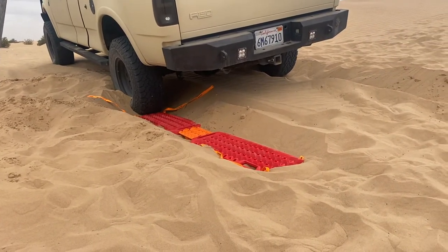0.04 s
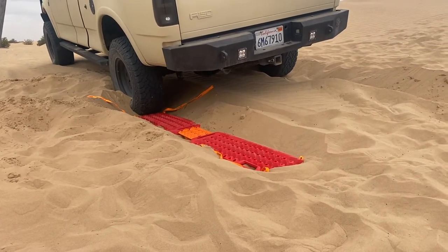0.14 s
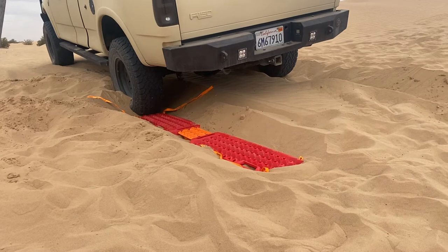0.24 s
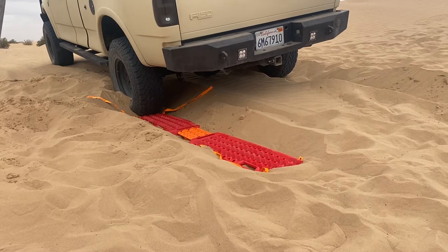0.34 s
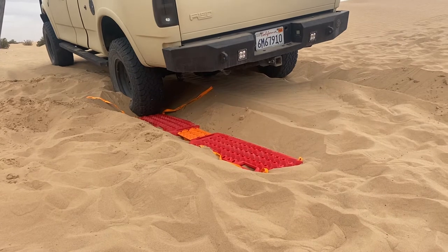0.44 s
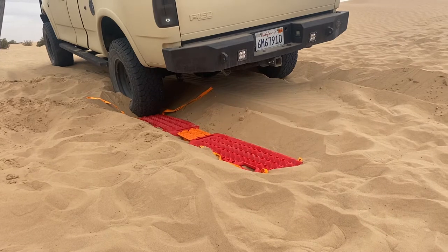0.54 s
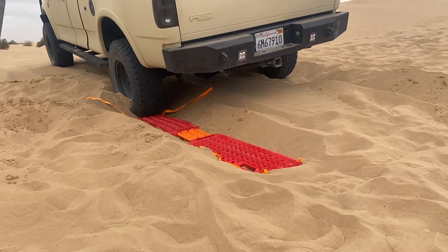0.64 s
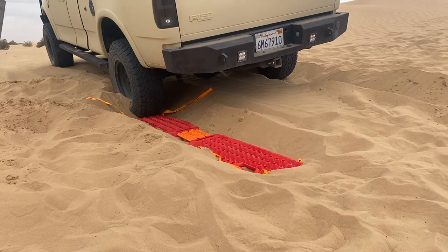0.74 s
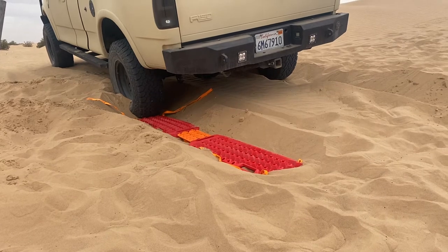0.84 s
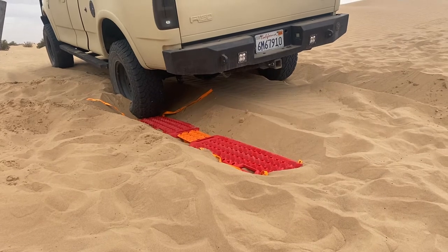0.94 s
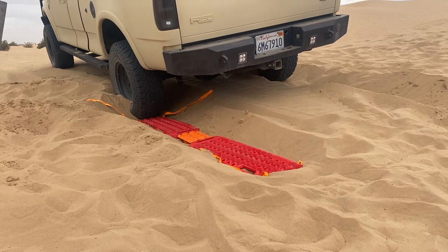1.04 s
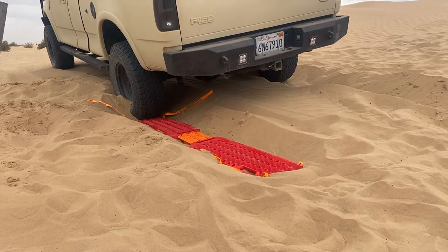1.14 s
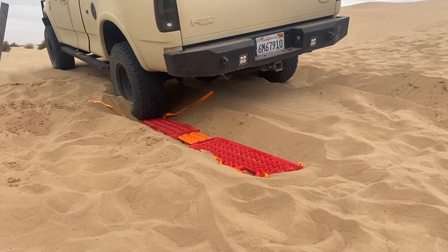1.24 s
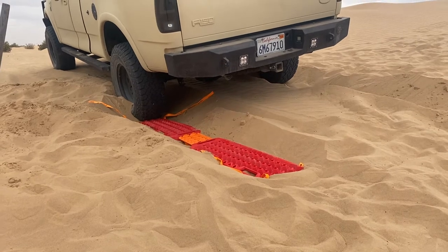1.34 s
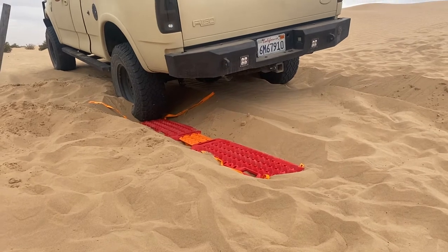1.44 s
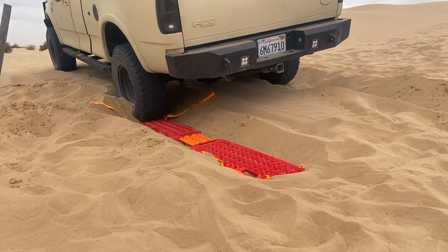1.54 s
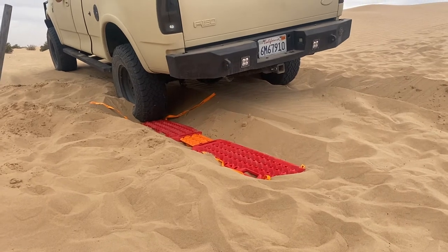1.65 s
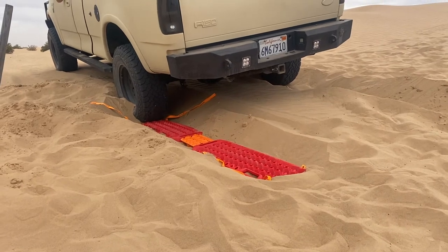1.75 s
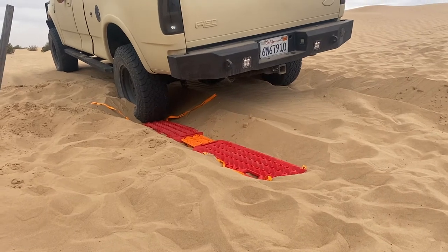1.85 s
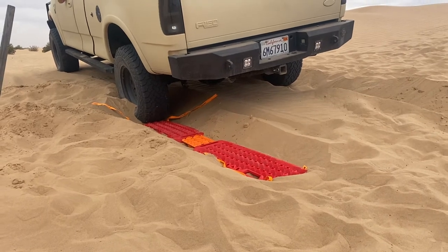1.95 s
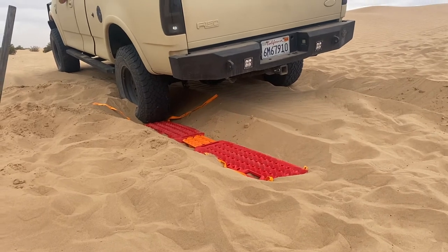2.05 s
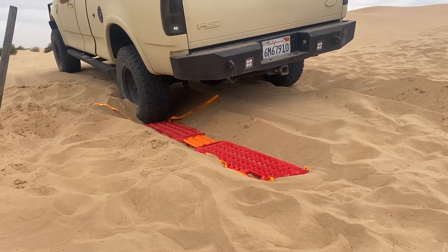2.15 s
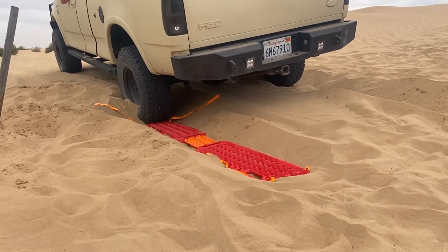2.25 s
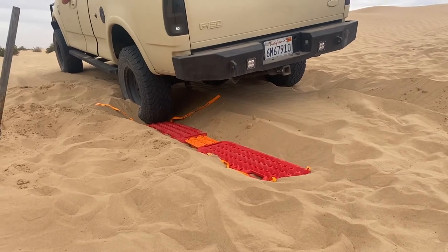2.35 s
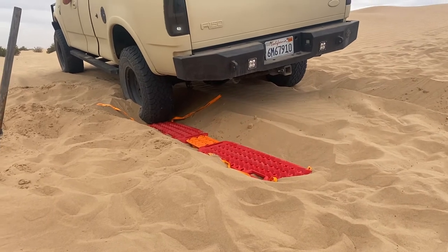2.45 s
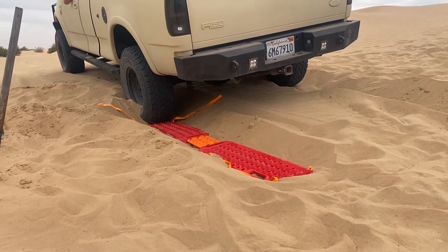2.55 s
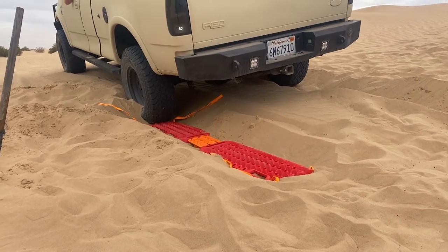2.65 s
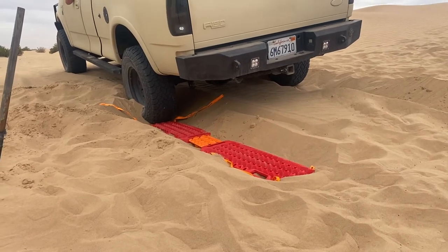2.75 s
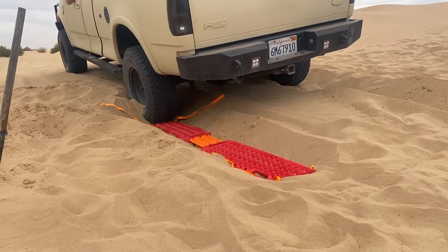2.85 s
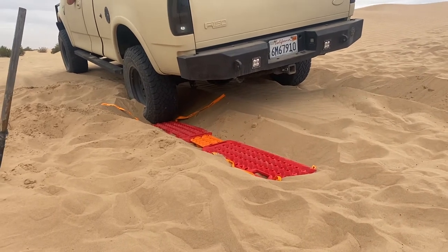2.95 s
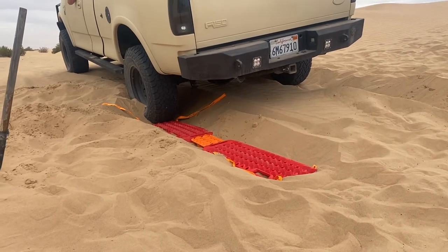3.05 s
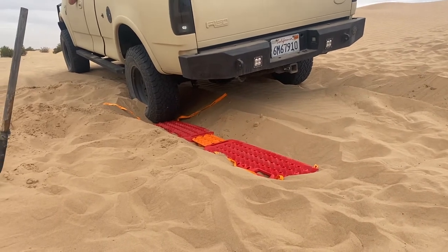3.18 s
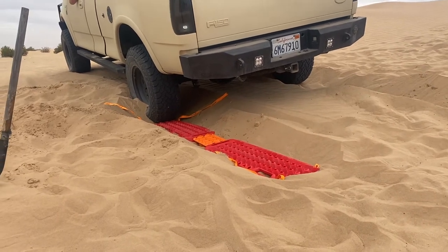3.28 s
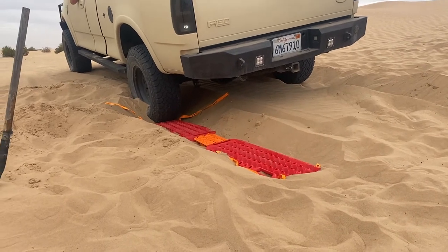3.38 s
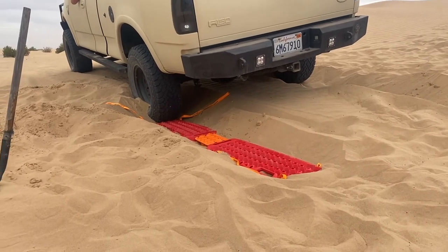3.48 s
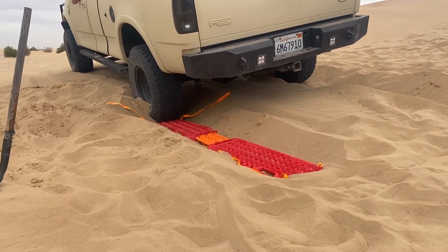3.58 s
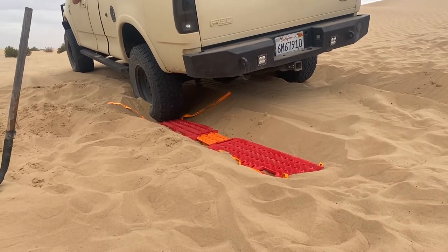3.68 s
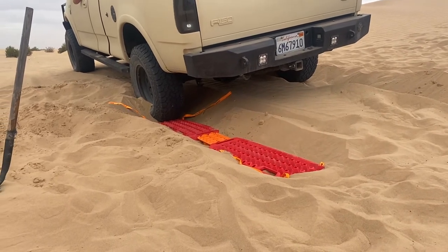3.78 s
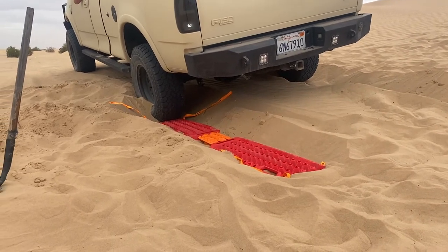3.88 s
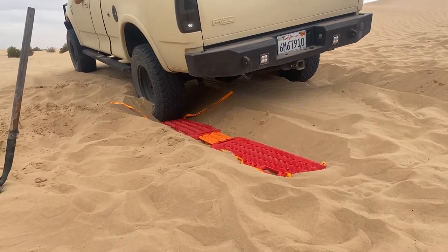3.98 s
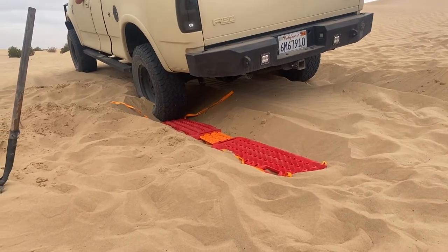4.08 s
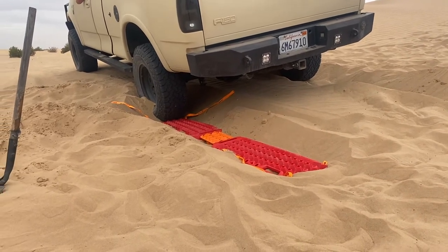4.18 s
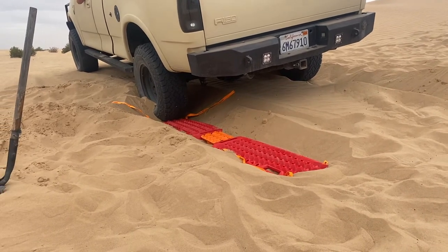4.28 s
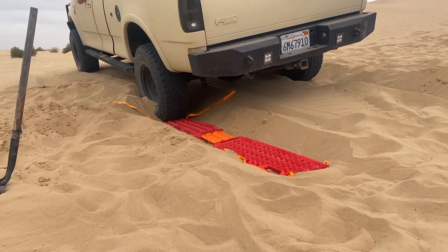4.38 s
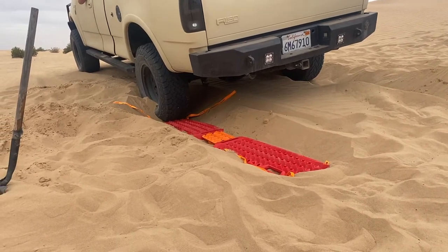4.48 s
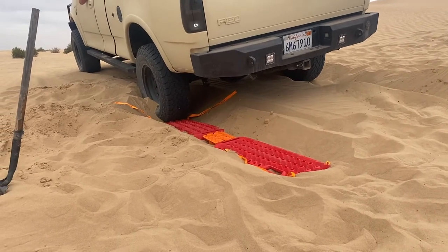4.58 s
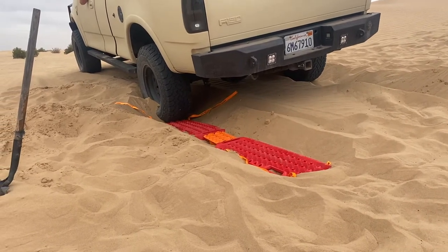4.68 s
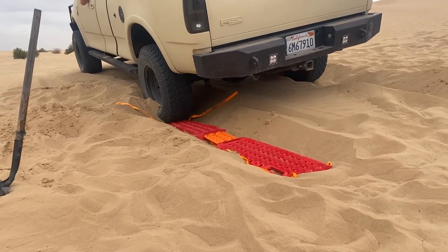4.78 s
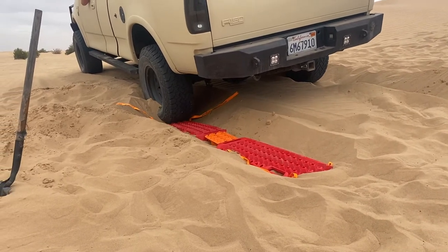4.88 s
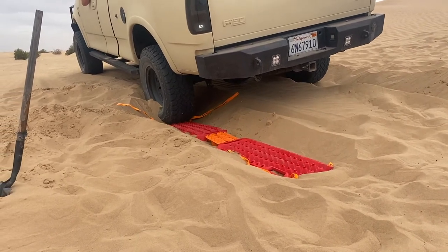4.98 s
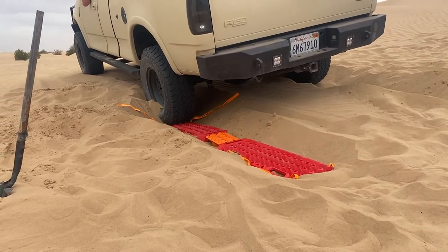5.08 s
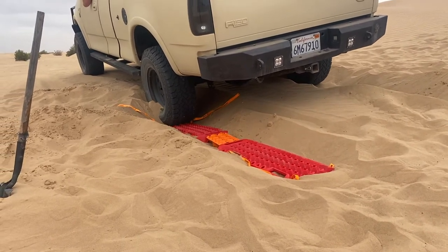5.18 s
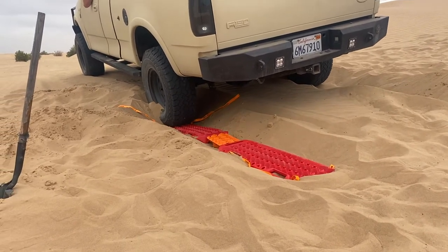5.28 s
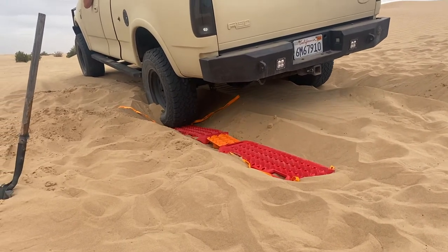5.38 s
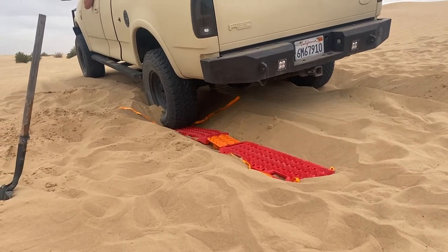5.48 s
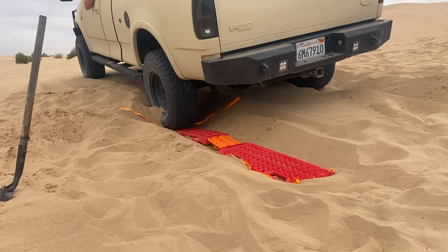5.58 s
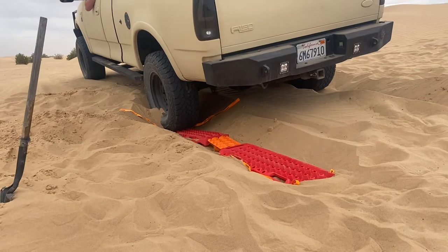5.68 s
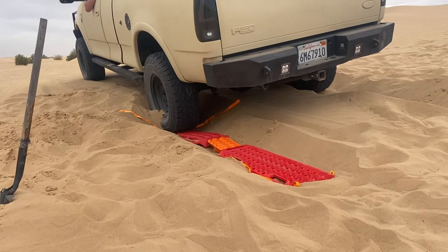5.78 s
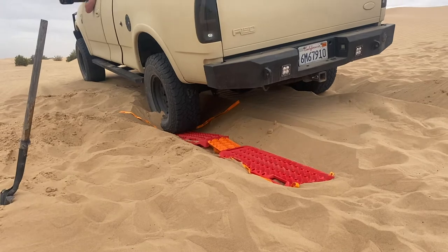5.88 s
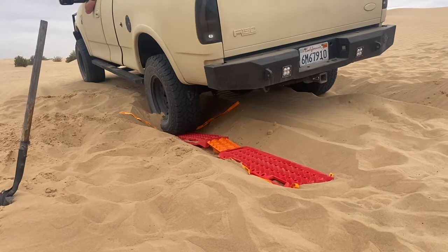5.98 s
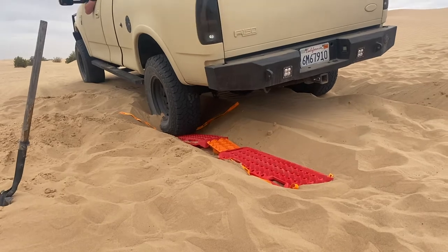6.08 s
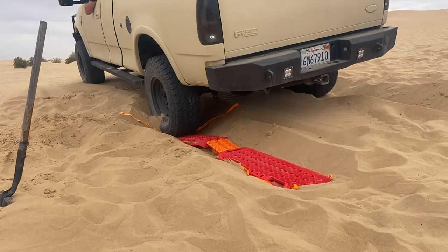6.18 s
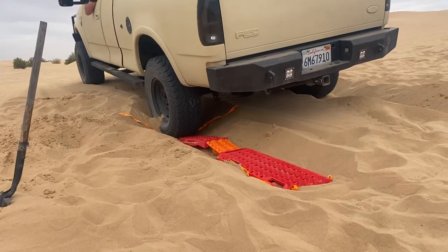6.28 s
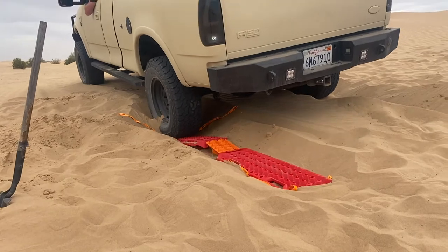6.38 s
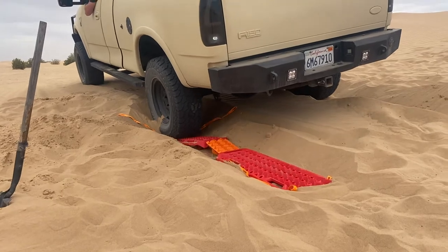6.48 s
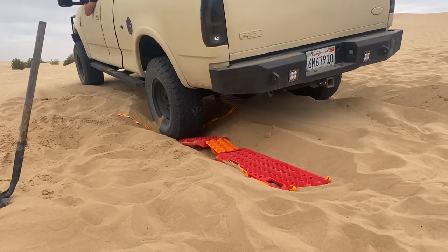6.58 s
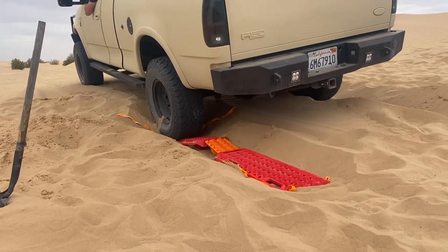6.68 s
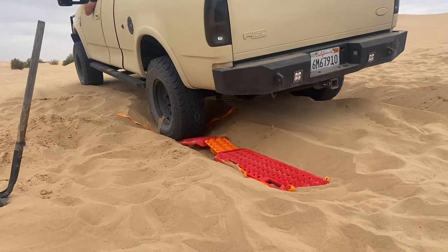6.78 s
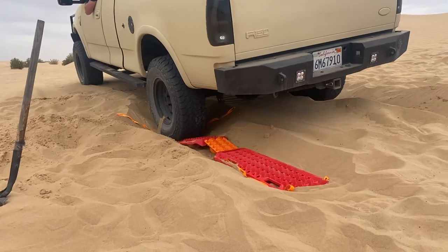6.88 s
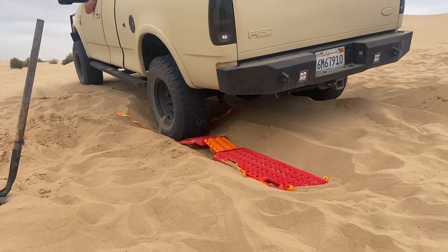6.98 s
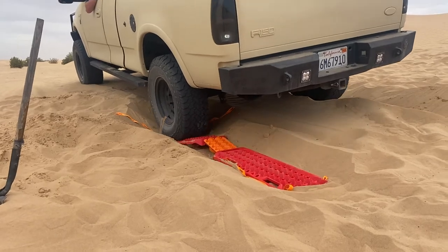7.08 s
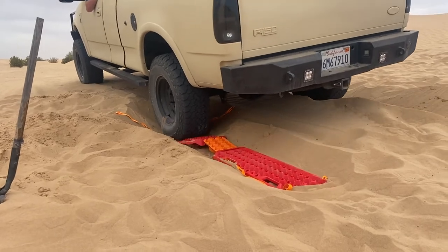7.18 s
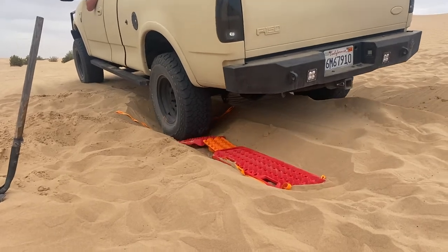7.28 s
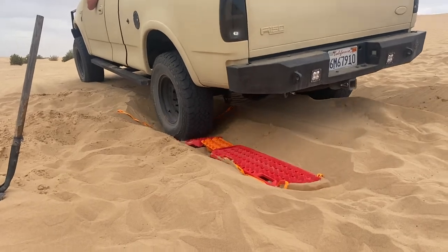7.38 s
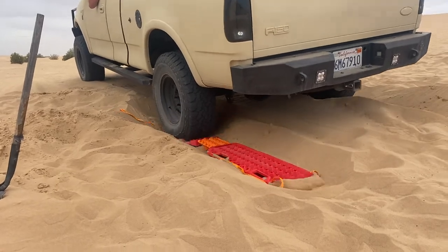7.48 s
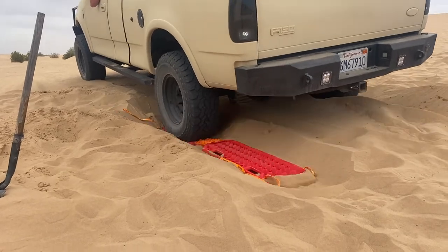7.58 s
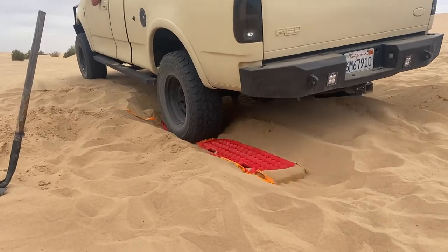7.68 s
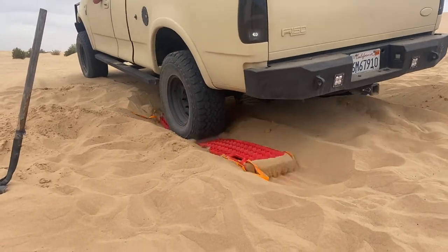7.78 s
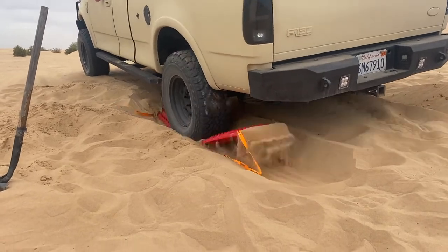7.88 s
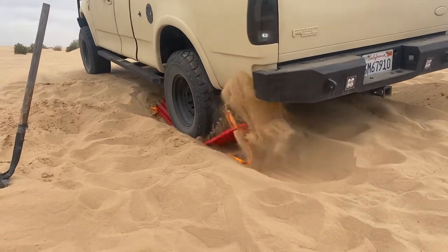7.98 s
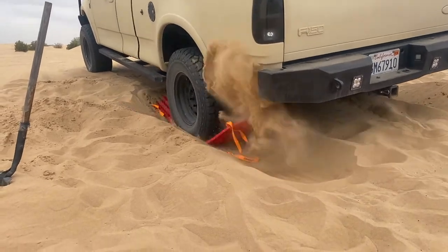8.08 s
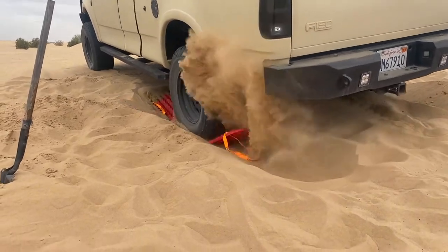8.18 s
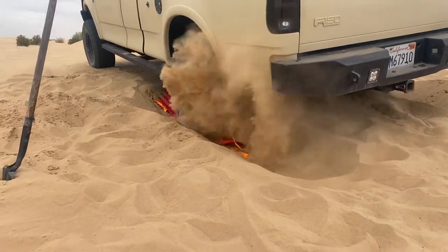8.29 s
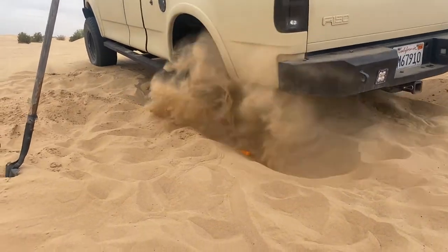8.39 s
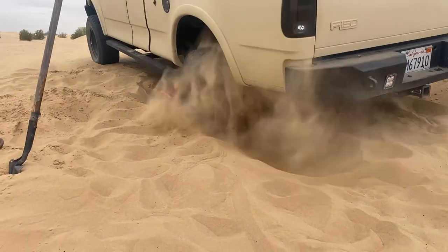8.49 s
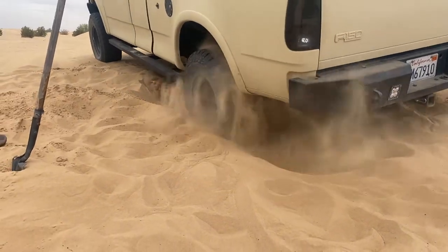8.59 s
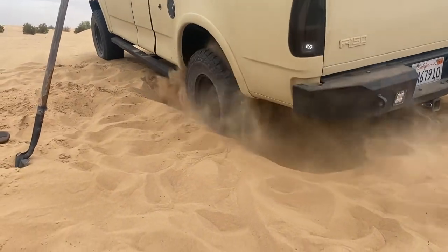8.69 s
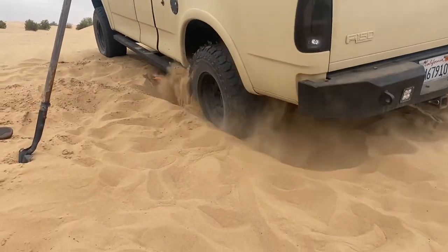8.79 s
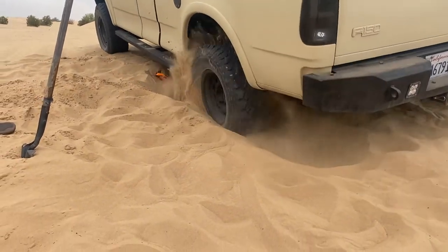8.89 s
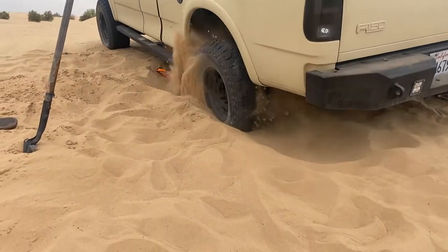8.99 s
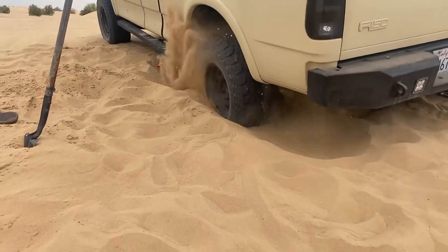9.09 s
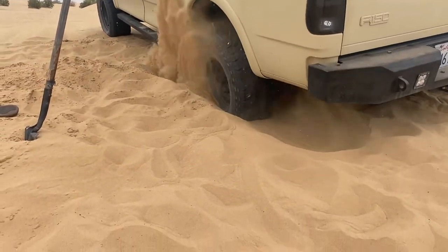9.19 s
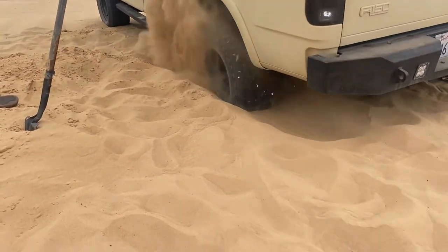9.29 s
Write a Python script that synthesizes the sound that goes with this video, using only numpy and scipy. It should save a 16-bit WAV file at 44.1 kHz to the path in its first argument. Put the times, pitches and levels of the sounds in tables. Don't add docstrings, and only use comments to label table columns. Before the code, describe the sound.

Outdoors on open sand, close behind a big petrol V8 pickup. A low, uneven exhaust drone idles with a faint loose-shield rattle and a few dull knocks, then rises in steps. Near the end it revs to a loud, strained roar while the spinning tyre drags a plastic board under with thumps, rapid clacks and a brief metal clank, throwing sand in a hiss. Handheld stereo microphone, mostly central, with slightly dulled treble.

```python
import sys
import numpy as np
from scipy import signal
from scipy.fft import rfft, irfft, next_fast_len
from scipy.io import wavfile
from scipy.ndimage import uniform_filter1d

SR = 44100
rng = np.random.default_rng(int(sys.argv[2]) if len(sys.argv) > 2 else 0)


def waveform_to_disk(signal):
    frames = np.transpose(np.atleast_2d(signal))
    scaled = np.clip(frames, -1, 1) * 32767
    samples = np.round(scaled).astype(np.int16)
    wavfile.write(sys.argv[1], SR, samples)


def boost(x):
    u = np.asarray(x, float) / 20
    return 10 ** u


N = 411894
STEP = 20

# (time [s], engine cycles per second [Hz])
SPEED = [(0.0, 7.1), (.8, 6.85), (1.2, 6.84), (1.75, 7.48), (3.56, 7.52), (4.3, 8.02), (4.9, 8.2),
         (5.7, 8.19), (6.16, 8.45), (6.81, 9.7), (7.1, 9.95), (7.33, 11.6), (7.57, 12.63), (8.2, 13.05),
         (8.53, 15.65), (8.79, 16.0), (9.07, 18.25), (9.34, 19.15)]
# (time [s], effort over idling [dB], uneven firings [dB])
EFFORT = [(0.0, 0, -33), (.6, -1, -34.5), (1.2, -1, -26), (1.75, 1.5, -27.5), (3.56, 1, -27),
          (4.29, 4, -19.5), (4.9, 2.5, -21.5), (5.7, 3, -23.5), (6.16, 5, -15), (6.81, 9, -20),
          (7.1, 10.5, -13), (7.57, 17.5, -25), (8.1, 17.5, -22), (8.45, 23, -25), (8.7, 21, -27.5),
          (9.05, 22.5, -19), (9.34, 24.5, -27.5)]


def engine():
    (cycle_hz,), (effort_db, uneven_db) = in_time(SPEED), in_time(EFFORT)
    return cycle_hz, effort_db, uneven_db


STRONG = [5, 8, 11, 16]
# (level when idling [dB], share of the effort [dB per dB])
STRONG_LEVELS = [(-4.5, 0.4), (-2.43, 0.64), (-3, 0.29), (-1.3, 0.45)]
# (frequency [Hz], level [dB])
TAILPIPE = [(34, -54.5), (43, -33), (62, -24.5), (88, -20), (102, -15), (114, -14.5), (129, -18),
            (152, -26), (200, -36.5), (300, -33.5)]
# (time [s], length [s], depth [dB])
STUMBLES = [(0.329, 0.063, 2.5), (0.796, 0.19, 3.5), (1.091, 0.036, 15), (1.245, 0.0087, 17),
            (4.29, 0.094, 6), (6.01, 0.034, 14.5), (6.14, 0.026, 13), (6.64, 0.016, 8), (6.99, 0.016, 4.5),
            (7.19, 0.021, -0.5), (8.155, 0.0087, 10)]


def strong_tones(cycle_hz, effort_db):
    dip_db = bumps(STUMBLES)
    return [follow(layer, effort_db) + at_hz(TAILPIPE, multiple * cycle_hz) - dip_db
            for multiple, layer in zip(STRONG, STRONG_LEVELS)]


EASY_BANKS = [-8, -10, -40, -10, -2, -40, -7, -8, -40, -10, -1, -1, 1, -40, -13, -4, -1, -3, -1, -11, -10,
              -4, -6, -1, -8, -1, -1, -9, -5, -9, -1, -9, -2, -4, -4, -6, -8, -12, 2, -8, -12, -6, -12, -6,
              -12, -4, -3, -12, -2, -8]
LOADED_BANKS = [-13, -12, -40, -16, -6, -40, -8, -15, -40, -13, -13, -9, -8, -40, -8, -4, -3, -15, -7, -10,
                -17, -13, -8, -5, -14, -9, -9, -9, -8, -6, -11, -12, -12, -12, -11, -8, -5, -5, -7, -9, -6,
                -6, -11, -9, -8, -8]
BANK_LIFT = {3: 17, 6: 5, 9: -4, 10: 3, 13: 14, 15: 4, 17: 2, 18: -7, 21: 10, 23: 9, 24: 19}


def bank_pattern(multiple, cycle_hz, loaded):
    i = multiple - 3
    easy_db = EASY_BANKS[i] if i < len(EASY_BANKS) else -8.0
    hard_db = LOADED_BANKS[i] if i < len(LOADED_BANKS) else -5.5
    flat_out_hz = (13.3, 17.5) if multiple < 20 else (16, 18)
    lift_db = np.interp(cycle_hz, flat_out_hz, (0, BANK_LIFT.get(multiple, 0)))
    return (1 - loaded) * easy_db + loaded * hard_db + lift_db


# (centre [Hz], width [Hz], lift running easy [dB], lift under load [dB])
CHAMBERS = [(302, 24, -4, 12), (400, 22, 13, 11), (487, 15, 13, 13), (540, 12, 9, 9), (600, 20, 9, 4),
            (710, 25, 0, 7)]


def silencer(hz, loaded):
    return sum((easy + loaded * (hard - easy)) / (1 + ((hz - centre_hz) / width_hz) ** 2)
               for centre_hz, width_hz, easy, hard in CHAMBERS)


# (frequency [Hz], level [dB])
PIPE = [(25, -5.5), (40, -13), (60, 0), (85, 6), (105, 14), (125, 14), (145, 5), (170, 2), (210, 4.5),
        (260, -1.5), (310, -8.5), (380, -19), (500, -21.5), (900, -35)]


def drone(cycle_hz, turns, main_db, side_db, roar_db):
    tracks = (cycle_hz, turns, side_db, roar_db, *main_db)
    cycle_hz, turns, side_db, roar_db, *main_db = [track[::STEP] for track in tracks]
    lumpy = 1.3 * (8 / cycle_hz) ** 1.5
    out = sum(tone(k * turns, db - 1.5 * lumpy, lumpy) for k, db in zip((5, 8, 11), main_db))
    out += tone(16 * turns, main_db[-1], unsteady=0.2)
    loaded = np.clip((cycle_hz - 9) / 4, 0, 1)
    for k in set(range(3, 52)) - {5, 8, 11, 16}:
        hz = k * cycle_hz
        bright_db = 0.36 * (roar_db + 31.0) * np.clip(np.log2(hz / 250), 0, None)
        level_db = bank_pattern(k, cycle_hz, loaded) + at_hz(PIPE, hz) + silencer(hz, loaded)
        level_db = level_db + bright_db + side_db - 10.0
        out += tone(k * turns, level_db, lumpy if k < 13 else .6 * lumpy)
    return signal.resample_poly(out, STEP, 1)[:N]


def tone(turns, level_db, unsteady):
    wobble = rng.random() + 0.063 * unsteady * drift(11.0, STEP)
    height = np.sqrt(2) * boost(level_db + 2.75 * unsteady * drift(5.35, STEP))
    return height * np.sin(2 * np.pi * (turns + wobble))


# (time [s], length [s], lift [dB])
SURGES = [
    (.07, 0.048, 0.5),
    (1.12, 0.029, 6),
    (1.31, 0.039, 8),
    (4.17, 0.096, -1),
    (5.94, 0.015, 7),
    (6.72, 0.098, 6),
    (7.3, 0.072, 3.5),
    (8.3, 0.052, 2),
]


def tyre_surges():
    return bumps(SURGES)


def firings(turns):
    return np.flatnonzero(np.diff(np.floor(8 * turns))) + 1


# (frequency [Hz], level [dB])
RUMBLE = [(15, -39.5), (30, -23), (45, 13.5), (65, 15.5), (90, 10.5), (115, 10), (140, -4.5), (200, -6.5),
          (260, -12.5), (400, -57.5), (900, -72.5), (3000, -140)]


def rumble(fired, level_db):
    pulses = np.zeros((2, N))
    pulses[:, fired] = rng.standard_normal((len(fired), 2)).T
    even = pulses / np.sqrt(uniform_filter1d(pulses[0] ** 2, SR))
    return boost(level_db - 1.5) * rms_one(coloured(even, RUMBLE))


# (frequency [Hz], level [dB per Hz])
ROAR = [(180, -18.5), (300, -3), (385, -4), (440, -4.5), (551, -7.5), (751, -18), (894, -15.5),
        (1060, -24.5), (1200, -22.5), (1410, -31.5), (1660, -28), (2200, -44), (2860, -64), (4840, -120)]


def gas_roar(roar_db, cycle_hz, turns):
    return rush(ROAR, roar_db + 1.0 - .8 * (cycle_hz - 8), turns, puff=.25, patchy_db=.5)


# (start [s], length [s], level [dB])
RATTLE = [
    (0.05, .07, -63),
    (.19, .07, -65),
    (1.52, .2, -64),
    (2.06, 1.7, -74),
    (4.1, .12, -75),
]


def shaking():
    t = np.arange(N) / SR
    rise_s, fall_s = .15, .09
    bouts = [db - 25 * np.maximum(0, np.maximum((s - t) / rise_s, (t - s - length) / fall_s))
             for s, length, db in RATTLE]
    held_db = np.max(bouts, axis=0)
    return held_db + .6 * np.interp(held_db, (-72, -64), (3, 1)) * drift(6.0)


# (frequency [Hz], level [dB], time to die 60 dB [s])
SHIELD = [(1990, -7.5, .04), (2681, -5, .06), (3036, 3.5, 0.068), (4690, -13, 0.033), (5600, -15, .01),
          (6490, -7, 0.015), (7520, -17.5, .01)]


def shield(fired):
    level_db = shaking()
    at = np.minimum(fired + rng.integers(0, 90, len(fired)), N - 1)
    taps_db = rng.normal(0, 2.0, (len(at), 1)) + rng.normal(0, 2.5, (len(at), len(SHIELD)))
    out, shake = np.zeros(N), np.zeros(N)
    for k, (hz, db, t60) in enumerate(SHIELD):
        clicks = np.zeros(N)
        clicks[at] = boost(level_db[at] + db + taps_db[:, k] + 8.5)
        hard = ring(clicks, hz, t60)
        soft = ring(hard, hz, 12 / hz)
        out += rms_one(soft) * np.std(hard)
    shake[at] = boost(1.5 * (level_db[at] + 60) - 57 + .5 * taps_db[:, 0])
    dying = signal.lfilter([1], [1, -boost(-60 / (.12 * SR))], shake)
    edges = signal.butter(2, [3300, 8000], "band", fs=SR, output="sos")
    return out + signal.sosfilt(edges, dying * rng.standard_normal(N))


# (time [s], peak level [dB], ring [Hz], time to die 60 dB [s])
KNOCKS = [(1.161, -33, 500, .03), (1.329, -23, 480, .04), (1.592, -20, 500, .035), (1.607, -20, 420, .04),
          (1.626, -28, 480, .03), (3.743, -31, 560, .025), (4.143, -29, 430, .03), (4.613, -30, 500, .025),
          (5.944, -19, 180, .07), (6.167, -19, 520, .035), (6.168, -16, 240, .05), (6.693, -18, 340, .04),
          (6.918, -17, 410, .03), (7.767, -17, 400, .04), (7.783, -17, 600, .06), (7.792, -12, 400, .08),
          (8.075, -18, 600, .03), (8.259, -19, 620, .06), (8.395, -16, 500, .06), (8.47, -13, 620, .05)]


def knocks():
    return blows(KNOCKS, [.55, 1, 1.3], crack_db=-8, rise_s=.003)


# (time [s], peak level [dB], ring [Hz], time to die 60 dB [s])
CLACKS = [(7.432, -26, 1510, .01), (7.458, -21, 1600, .022), (7.5, -24, 1620, .013),
          (7.775, -26, 1500, .02), (7.735, -28, 1260, .03), (7.79, -25, 1500, .03),
          (8.0244, -30, 1500, .017), (8.0487, -27, 1700, .017), (8.077, -26, 1300, .015),
          (8.221, -25, 1300, .012), (8.2392, -23, 1800, .012), (8.259, -21, 1100, .014),
          (8.272, -17, 1600, .02), (8.2945, -18, 1750, .02), (8.273, -20, 800, .025),
          (8.295, -23, 1000, .02), (8.308, -20, 1700, .016), (8.317, -19, 1500, .02),
          (8.327, -21, 1350, .015), (8.354, -19, 1600, .014), (8.394, -17, 1650, .025),
          (8.3945, -19, 1200, .025), (8.407, -25, 1400, .012), (8.509, -23, 1900, .014),
          (8.5539, -27, 1700, .01), (8.189, -29, 1900, .012), (8.452, -28, 1100, .012),
          (8.616, -28, 1300, .012), (9.146, -29, 1100, .012), (9.198, -27, 1100, .014)]


def board_clacks():
    return blows(CLACKS, [1, 1.14], crack_db=-5, rise_s=.0028)


# (time [s], peak level [dB], ring [Hz], time to die 60 dB [s])
CLANK = [
    (8.322, -26, 2400, .13),
    (8.337, -25, 2100, .13),
]
# (time [s], peak level [dB], ring [Hz], time to die 60 dB [s])
CLINK = [
    (8.308, -40, 3700, .04),
    (8.317, -37, 4100, .05),
    (8.333, -37, 4500, .12),
    (8.339, -37, 3900, .11),
]


def metal_clank():
    return blows(CLANK, [1], crack_db=-16, rise_s=.014) + blows(CLINK, [1], crack_db=-16, rise_s=.01)


# (time [s], peak level [dB], centre [Hz], time
# to die 60 dB [s])
SLAPS = [(7.46, -51, 1632, 0.077), (7.78, -41, 1482, 0.073), (8.025, -34.5, 4010, 0.075),
         (8.05, -44, 3950, 0.043), (8.115, -42.5, 4065, 0.11), (8.27, -33, 1490, 0.11),
         (8.3, -36, 1802, 0.11), (8.312, -33, 2097, 0.11), (8.33, -30.5, 1766, 0.1),
         (8.485, -41.5, 5560, .06), (8.51, -34.5, 2983, 0.039), (8.555, -44.5, 4100, 0.029),
         (4.5, -64, 6000, .02), (8.025, -47, 9000, .05), (8.05, -47, 9000, .06), (8.115, -46, 5000, .04),
        (8.22, -38, 1500, .12), (8.25, -38, 1800, .15), (8.3, -46, 5500, .2), (8.395, -37, 1500, .1),
        (7.44, -41, 1700, .15), (7.76, -38, 1200, .12), (7.786, -27, 750, .1), (7.786, -36, 1600, .07),
        (8.48, -37, 1800, .1), (7.26, -42, 1700, .2)]


def sand_slaps():
    return blows(SLAPS, [], crack_db=0, rise_s=.002)


# (frequency [Hz], level [dB per Hz])
SPRAY = [(1500, -18.5), (3000, -11.5), (5000, -13), (8000, -4), (11000, -9), (16000, -9)]


def sand_spray(hiss_db, turns):
    return rush(SPRAY, hiss_db + .5 * (hiss_db + 42.0) - 7.0, turns, puff=0, patchy_db=3.0)


# (time [s], peak level [dB], ring [Hz], time to die 60 dB [s])
CREAKS = [
    (4.118, -52, 2800, .03),
    (4.145, -52, 2500, .04),
    (4.181, -51, 2600, .03),
    (4.214, -52, 2550, .03),
    (4.806, -48, 2480, .05),
]


def spring_creaks():
    return blows(CREAKS, [1], crack_db=-8, rise_s=.004)


# (frequency [Hz], level [dB per Hz])
HISS = [(700, -35.5), (1200, -6), (1700, -5.5), (2200, -10), (3150, -13.5), (3400, -16), (5500, -22),
        (8000, -32.5), (16000, -44)]


def fan_hiss(hiss_db, turns):
    return rush(HISS, hiss_db + 3.0, turns, puff=.08, patchy_db=.3)


# (frequency [Hz], width [Hz], level [dB])
PANELS = [
    (392, 14, -37),
    (485, 12, -35),
    (539, 10, -38),
    (597, 10, -40),
    (689, 14, -46),
]
# (time [s], level [dB])
PANELS_SING = [(0, -29), (7.3, -30.5), (7.5, -1), (8.1, -1), (8.35, -5), (9.34, -18.5)]


def panels():
    return boost(in_time(PANELS_SING)[0]) * resonant_air(PANELS)


# (frequency [Hz], width [Hz], level [dB])
WHISTLES = [(682, 24, -57), (910, 20, -68), (965, 20, -65), (1170, 30, -70), (1345, 70, -68),
            (1600, 30, -70), (2090, 50, -73)]


def whistles(hiss_db):
    return resonant_air(WHISTLES) * boost(0.55 * (hiss_db + 59))


# (frequency [Hz], level [dB], fade once the load builds [dB])
WHINES = [
    (1707, -70, 4),
    (1938, -78, 0),
    (11870, -89, 0),
    (12107, -89, 0),
]


def whines():
    t = np.arange(N) / SR
    load = np.interp(t, (3.8, 4.6), (0, 1))
    out = np.zeros(N)
    for hz, db, fade_db in WHINES:
        height = np.sqrt(2) * boost(db - fade_db * load + 2.5 * drift(4))
        out += height * np.sin(2 * np.pi * (hz * t + .12 * drift(hz / 500)))
    return out


def rush(spectrum, level_db, turns, puff, patchy_db):
    beat = 1 + puff * np.cos(16 * np.pi * turns)
    flicker = boost(patchy_db * drift(25.0))
    return boost(level_db) * rms_one(coloured(rng.standard_normal((2, N)) * beat * flicker, spectrum))


def blows(events, overtones, crack_db, rise_s):
    out, age = np.zeros(N), np.arange(SR // 8) / SR
    for s, db, hz, t60 in events:
        body = sum(np.sin(2 * np.pi * hz * k * age) / k for k in overtones)
        band = signal.butter(4, [hz * .5, hz * 1.45], "band", fs=SR, output="sos")
        burst = signal.sosfilt(band, rng.standard_normal(len(age)))
        shape = boost(db - 60 * age / t60) * np.minimum(age / rise_s, 1) ** 2
        at = round((s - rise_s) * SR)
        out[at:at + len(age)] += shape * (body + boost(crack_db) * rms_one(burst))
    return out


def resonant_air(resonances):
    air, out = rng.standard_normal(N), 0
    for hz, width_hz, db in resonances:
        t60 = np.log(1000) / (np.pi * width_hz)
        out = out + boost(db) * rms_one(ring(ring(air, hz, t60), hz, t60))
    return out


def ring(clicks, hz, t60):
    r, w = boost(-60 / (t60 * SR)), 2 * np.pi * hz / SR
    return signal.lfilter([0, np.sin(w)], [1, -2 * r * np.cos(w), r * r], clicks + 1e-18)


def in_time(rows):
    s, *columns = np.transpose(rows)
    return [np.interp(np.arange(N) / SR, s, c) for c in columns]


def at_hz(points, hz):
    table = np.array(points)
    return np.interp(np.log(hz + 1e-9), np.log(table[:, 0]), table[:, 1])


def follow(layer, effort_db):
    idle_db, share = layer
    return idle_db + share * effort_db


def bumps(events):
    t = np.arange(N) / SR
    return sum(db * np.exp(-((t - s) / length) ** 2) for s, length, db in events)


def rms_one(x):
    return x / np.sqrt(np.mean(x ** 2) + 1e-20)


def drift(rate, step=1):
    r = np.exp(-200 * np.pi * rate / SR)
    noise = rng.standard_normal(N // 100 + 1002)
    slow = signal.lfilter([1], [1, -2 * r, r * r], noise)[1000:]
    return np.interp(np.arange(0, N, step) / 100, np.arange(len(slow)), rms_one(slow))


def coloured(x, spectrum):
    size = next_fast_len(N + SR)
    size += size % 2
    fold = irfft(np.log(boost(at_hz(spectrum, np.fft.rfftfreq(size, 1 / SR)))), size)
    fold[1:size // 2] *= 2
    fold[size // 2 + 1:] = 0
    return irfft(rfft(x, size) * np.exp(rfft(fold)), size)[..., :N]


# (frequency [Hz], side minus mid [dB])
WIDTH = [(30, -20), (90, -19.5), (180, -22.5), (350, -12), (1000, -9), (2500, -4), (5000, -3.5), (9000, -2),
         (14000, -0.5)]
# (frequency [Hz], left minus right [dB])
LEAN = [(30, -.3), (100, -1.2), (400, -1.8), (1200, -.3), (3500, .4), (10000, -1.3)]


def spread(mid, side, steady):
    side = coloured(side + np.roll(steady, 110), WIDTH)
    left = coloured(mid + steady + side, [(hz, db / 2) for hz, db in LEAN])
    right = coloured(mid + steady - side, [(hz, -db / 2) for hz, db in LEAN])
    return np.array([left, right])


SIDE_TONES, GAS_ROAR, FAN_HISS = (-31, 0.7), (-44, 1.193), (-64, 0.9)


def scene():
    cycle_hz, effort_db, uneven_db = engine()
    surge_db = tyre_surges()
    side_db = follow(SIDE_TONES, effort_db) + surge_db
    roar_db = follow(GAS_ROAR, effort_db) + 0.67 * surge_db
    hiss_db = uniform_filter1d(follow(FAN_HISS, effort_db), SR // 4)
    turns = np.cumsum(cycle_hz) / SR
    fired = firings(turns)
    steady = drone(cycle_hz, turns, strong_tones(cycle_hz, effort_db), side_db, roar_db)
    steady += shield(fired)
    steady += knocks() + board_clacks() + metal_clank() + sand_slaps() + spring_creaks()
    steady += panels() + whistles(hiss_db) + whines()
    wide = rumble(fired, uneven_db - .5 * (cycle_hz - 8)) + gas_roar(roar_db, cycle_hz, turns)
    wide += sand_spray(hiss_db, turns) + fan_hiss(hiss_db, turns)
    mid, side = wide
    return spread(mid, side, steady)


# (frequency [Hz], level [dB])
GAPS = [(8100, 0), (8400, -45), (9600, -45), (9800, 0), (12200, 0), (12500, -45), (13800, -45), (14000, 0),
        (15600, 0), (15900, -45)]


def drop_bands(x):
    return coloured(x, GAPS)


def roll_off(x):
    return signal.sosfilt(signal.butter(12, 15700, fs=SR, output="sos"), x)


def record(dry):
    squeezed = dry / (1 + np.abs(dry / .95) ** 4) ** .25
    return roll_off(drop_bands(squeezed))


dry = scene()
out = record(dry)
waveform_to_disk(out)
```